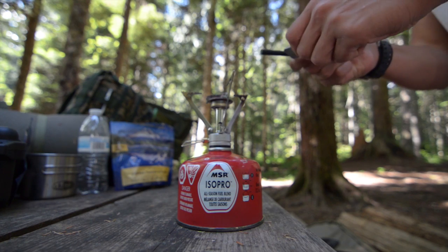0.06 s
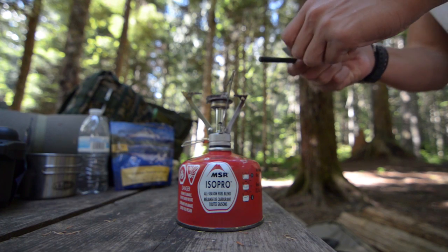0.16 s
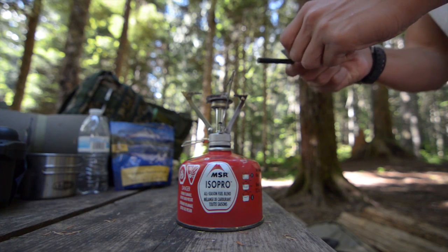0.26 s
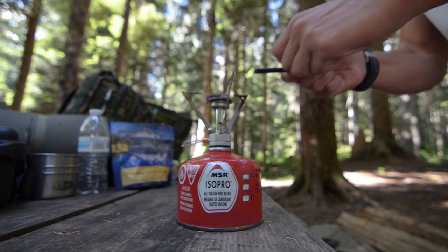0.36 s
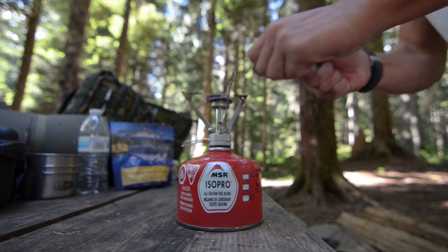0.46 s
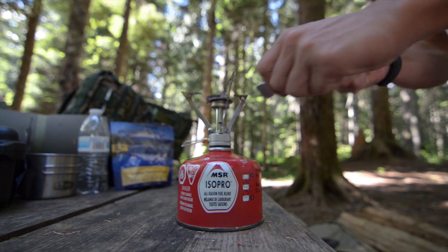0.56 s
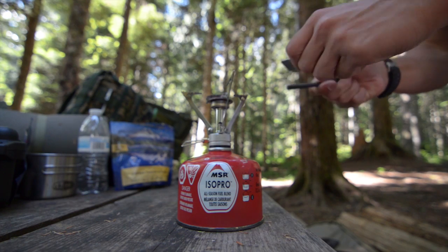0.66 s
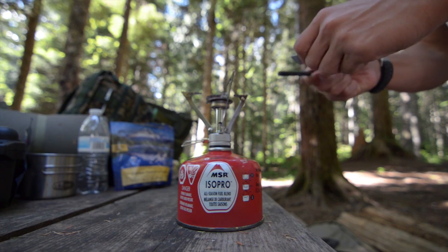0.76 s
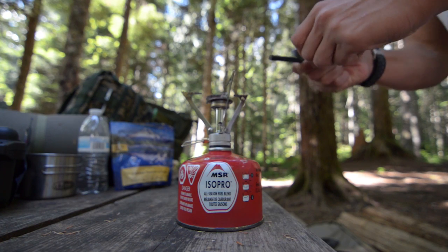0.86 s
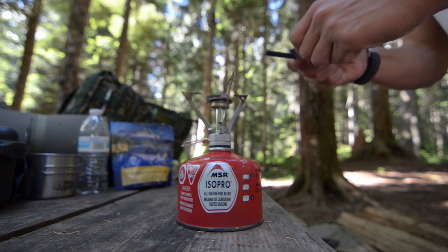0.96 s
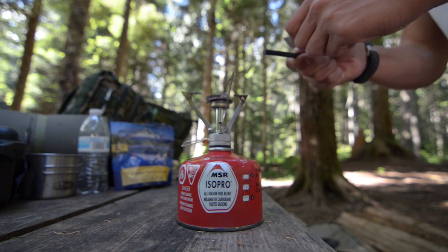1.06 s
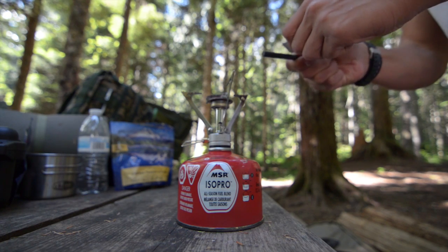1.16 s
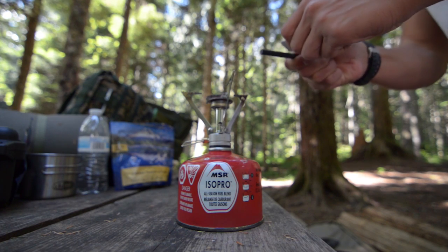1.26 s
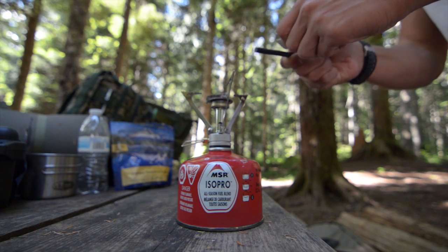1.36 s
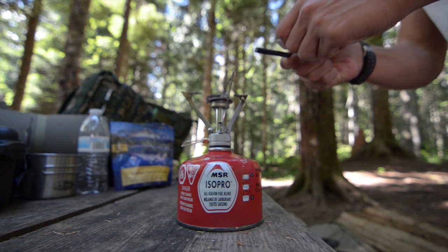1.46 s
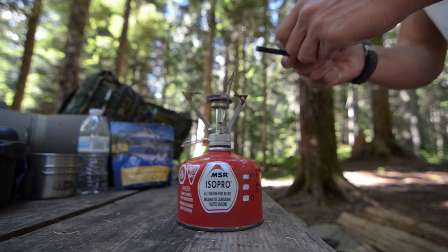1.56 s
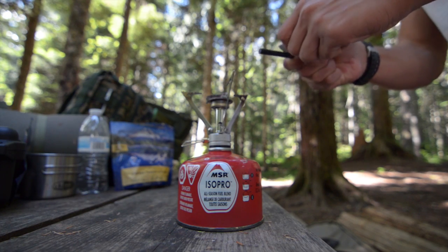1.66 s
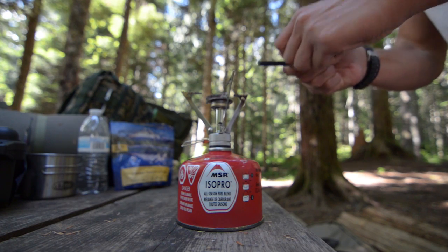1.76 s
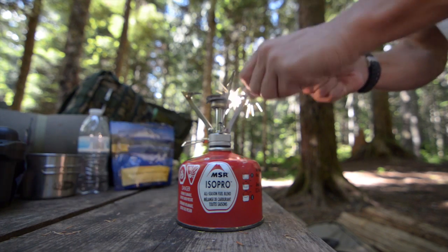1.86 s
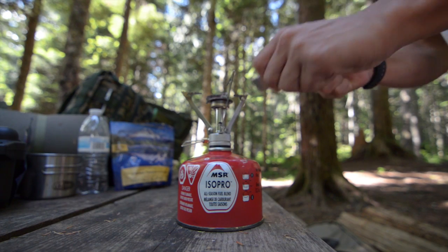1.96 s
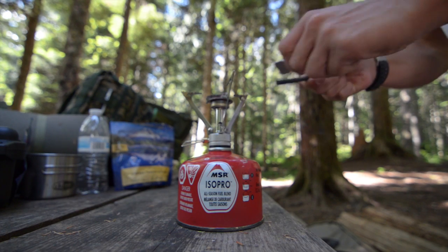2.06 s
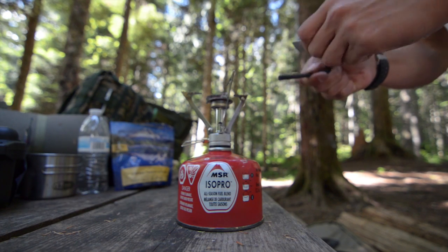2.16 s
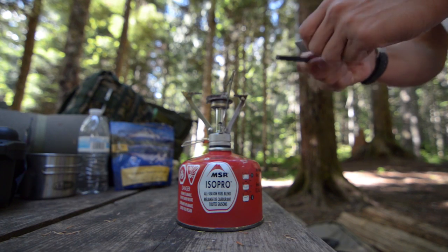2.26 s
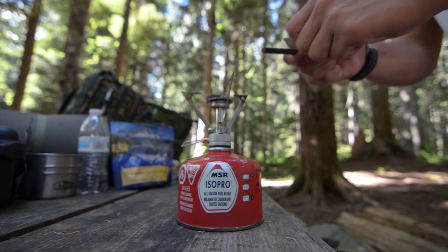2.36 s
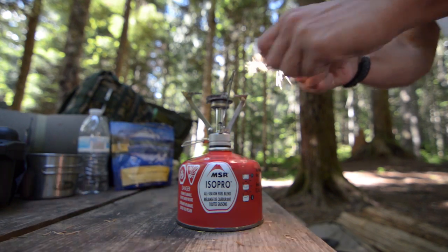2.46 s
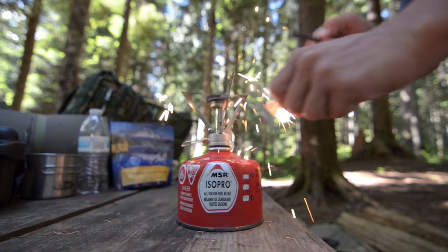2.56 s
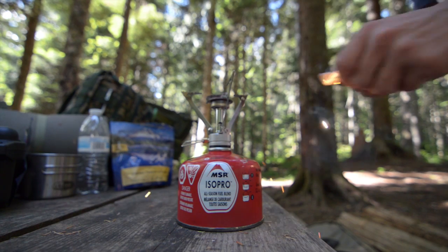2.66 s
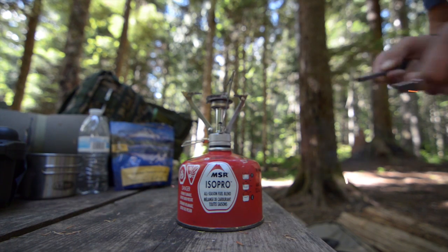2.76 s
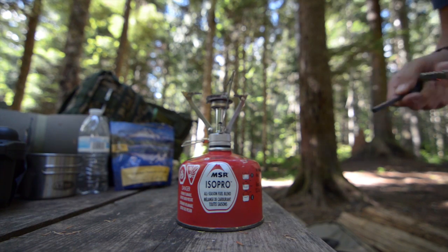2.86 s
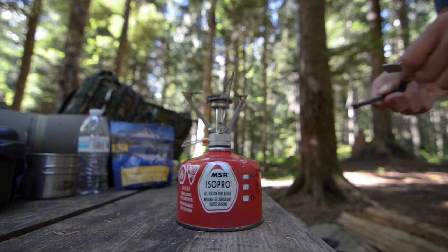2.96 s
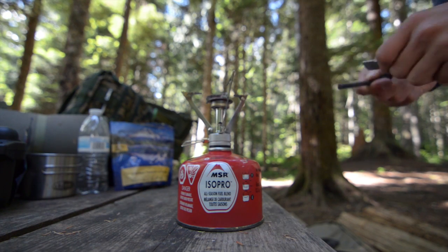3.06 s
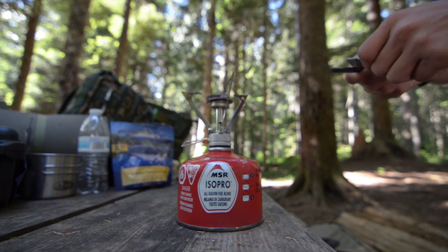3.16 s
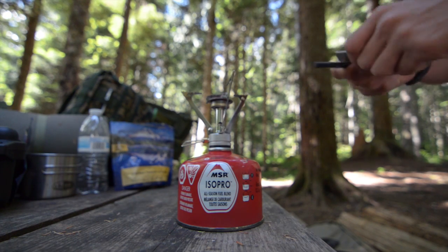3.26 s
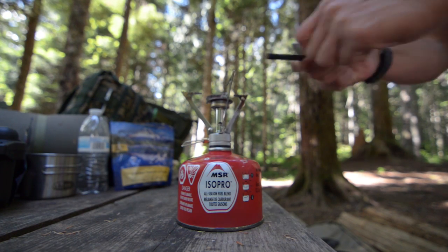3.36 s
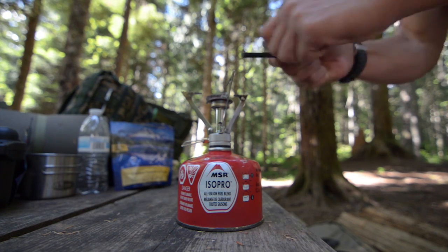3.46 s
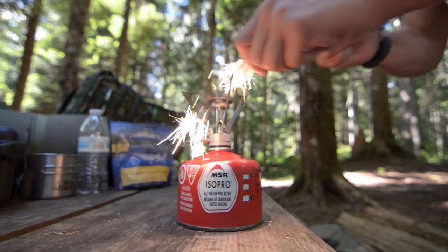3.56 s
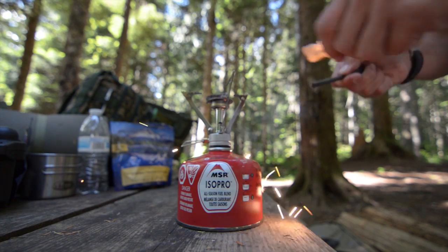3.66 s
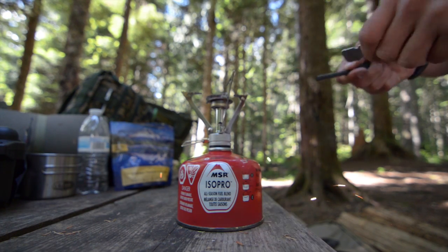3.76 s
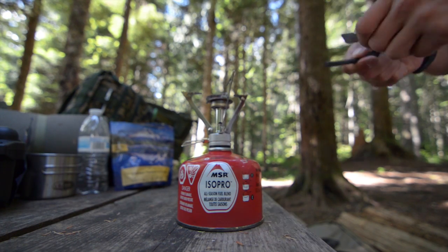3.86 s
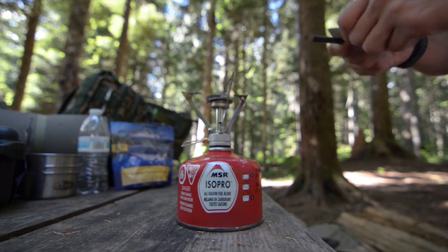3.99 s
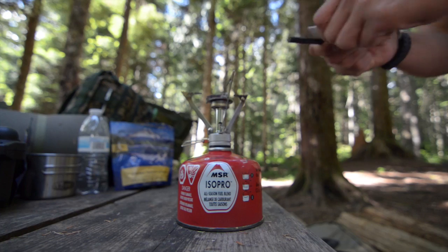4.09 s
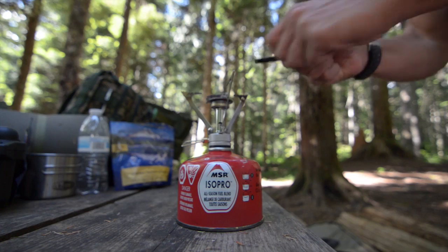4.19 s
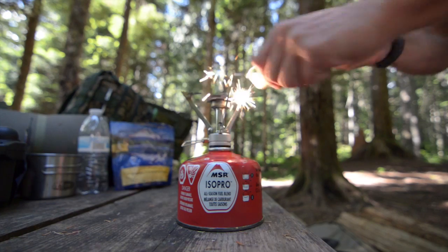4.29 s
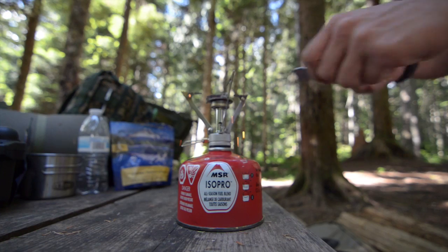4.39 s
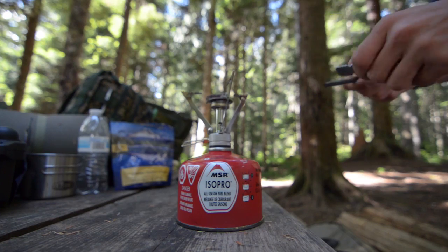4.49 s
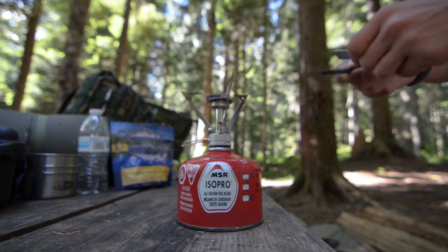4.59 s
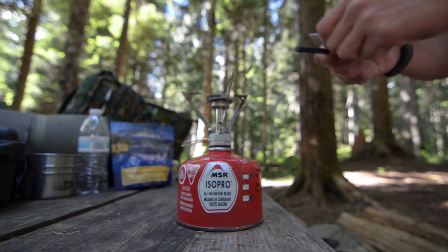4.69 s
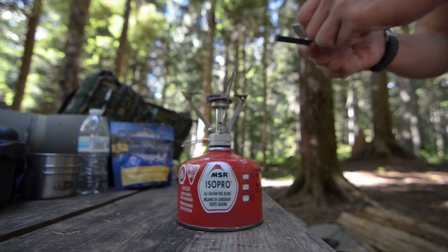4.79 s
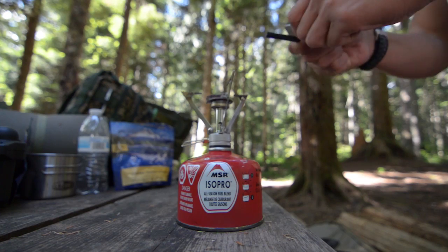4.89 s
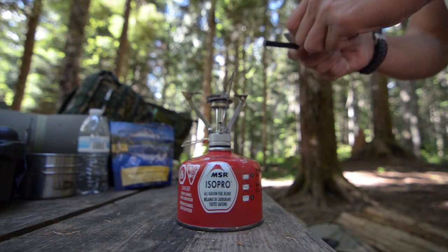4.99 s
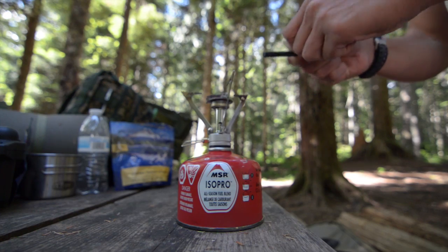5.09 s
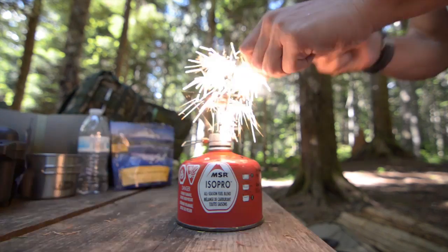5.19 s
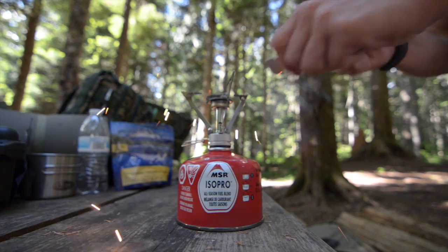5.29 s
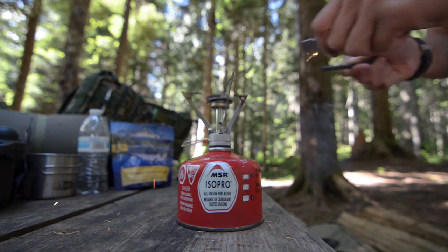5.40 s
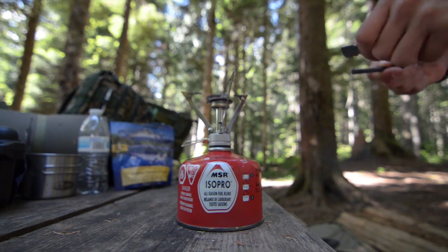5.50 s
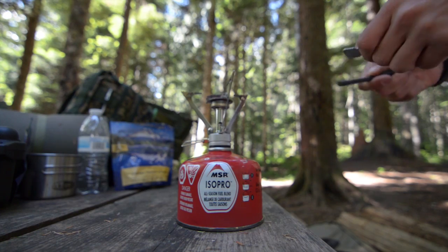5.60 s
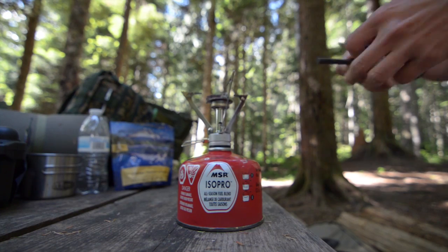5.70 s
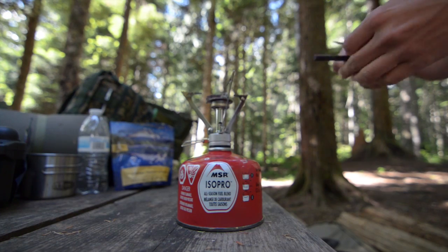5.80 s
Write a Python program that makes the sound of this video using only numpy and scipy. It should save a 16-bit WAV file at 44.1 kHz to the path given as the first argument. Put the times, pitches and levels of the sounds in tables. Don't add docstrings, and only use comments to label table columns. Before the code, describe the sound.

A close outdoor recording with a faint steady gas hiss from a stove burner and low, lumpy wind buffeting a small microphone. Soft scuffs and light steel taps open it. At 0.5 s a quick scrape ends in a hard, bright metallic snap without sparks. Small ticks follow, then a longer, duller scrape at 1.9 s with a softer snap and brief weak fizz. A clear tap at 2.3 s precedes a raspy stroke at 2.5 s: the loudest snap, then a short flame-like puff, fizz and crackling pops until about 2.75 s. Strokes at 3.55 and 4.3 s snap sharply with bursts of spitting sparks, the latter shorter. Wind weakens around 3.6 s, then swells with deep thumps near 5 s. The last loud, raspy strike at 5.2 s bursts into bright fizz and pops, with tiny ticking embers fading by 5.45 s, leaving hiss and easing wind.

```python
import sys
import numpy as np
from scipy import signal
from scipy.fft import rfft, irfft, next_fast_len
from scipy.io import wavfile
from scipy.ndimage import uniform_filter1d, map_coordinates

SR = 44100
rng = np.random.default_rng(int(sys.argv[2]) if len(sys.argv) > 2 else 0)


def wrap_up_sound(samples):
    columns = np.atleast_2d(samples).T
    tamed = np.clip(columns, -1, 1)
    steps = np.round(tamed * 32767).astype(np.int16)
    wavfile.write(sys.argv[1], SR, steps)


def natural_amplitude(level_db):
    exponent = np.asarray(level_db, float) / 20
    return 10 ** exponent


N = 257544


def unit(x):
    return x / np.sqrt(np.mean(x ** 2) + 1e-20)


def curve(rows, column, outside=None):
    rows = np.asarray(rows)
    return np.interp(np.arange(N) / SR, rows[:, 0], rows[:, column], outside, outside)


BURST_HOLD_S = 0.006


def effort(bursts, lead=0):
    held = []
    for rows in bursts:
        before = (rows[0][0] - lead, *rows[0][1:])
        after = (rows[-1][0] + BURST_HOLD_S, *rows[-1][1:])
        held.append([before, *rows, after])
    main = [curve(rows, 1, -150) for rows in held]
    relative = [[0] + [curve(rows, k) for k in range(2, len(rows[0]))] for rows in held]
    gains = []
    for k in range(len(relative[0])):
        loudest_db = np.max([a + b[k] for a, b in zip(main, relative)], axis=0)
        gains.append(uniform_filter1d(natural_amplitude(loudest_db), size=60))
    return gains


def wobble(rate):
    knots = rng.standard_normal(int(N * rate / SR) + 4)
    return map_coordinates(knots, [np.arange(N) * rate / SR])


def filtered(x, response):
    m = next_fast_len(len(x) + 8192)
    return irfft(rfft(x, m) * response(np.fft.rfftfreq(m, 1 / SR)), m)[:len(x)]


def colour(points):
    f, db = np.transpose(points)
    return lambda hz: natural_amplitude(np.interp(np.log(hz + 1), np.log(f + 1), db))


def resonance(f, centre, width):
    return 1j * f * width / (centre * centre - f * f + 1j * f * width)


def modes(rows):
    return lambda f: sum((-1) ** k * natural_amplitude(db) * resonance(f, c, w) for k, (c, w, db) in enumerate(rows))


def grit(rate, spread_db):
    luck, size, sign = rng.random(N), rng.exponential(size=N), rng.standard_normal(N)
    return (luck < rate / SR) * sign * natural_amplitude(spread_db * np.minimum(size, 4.5))


def struck(blow, *resonances):
    blow = filtered(blow, lambda f: 1 / (1 + 1j * f / 11000) ** 3)
    for rows in resonances:
        blow = filtered(blow, modes(rows))
    return blow / np.max(abs(blow))


# frequency in Hz, level in dB per Hz.
GAS = [(120, -13), (200, -12.5), (236, -11), (458, -9), (662, -8), (922, -8.5), (1130, -10), (2680, -15),
       (2890, -15.5), (4170, -10), (5600, -22), (6140, -15.5), (9040, -24), (14900, -46.5), (16300, -52)]
# peak in seconds, rise and fall in seconds, level in dB.
MURMURS = [
    (.745, 0.09, -48.5),
    (3.006, .045, -47),
]


def gas():
    flutter = [(640, 510, 0)]
    murmur = filtered(filtered(rng.standard_normal(N), modes(flutter)), modes(flutter))
    ends_db = -10
    swell, = effort([[(s - d, db + ends_db), (s, db), (s + d, db + ends_db)] for s, d, db in MURMURS])
    hiss = filtered(rng.standard_normal(N), colour(GAS))
    sway_db = 0.3 * (wobble(28) + wobble(1.28))
    return natural_amplitude(-49 + sway_db) * unit(hiss) + swell * unit(murmur)


# frequency in Hz, level in dB per Hz.
BUFFET = [(12, -47), (20, -3), (59, 3.5), (75, 2), (215, -10), (316, -14), (433, -21), (600, -72),
          (780, -59), (1320, -120)]
# time in seconds, buffeting level in dB.
WIND = [(0.0, -58.5), (0.34, -53), (0.71, -56), (1.71, -53.5), (1.97, -55), (2.26, -60.5), (2.62, -53),
        (2.7, -53), (2.83, -58), (3.61, -64), (4.26, -61.5), (4.9, -49), (5.09, -45.5), (5.38, -45),
        (5.56, -54), (5.84, -62.5)]
# time in seconds, peak in dB, pitch in Hz.
THUMPS = [(.461, -30.5, 185), (.521, -35, 85), (.824, -34.5, 76), (1.117, -37, 114), (1.271, -30, 97),
          (1.539, -29.5, 94.5), (1.653, -32.5, 99), (1.793, -31, 100), (2.515, -33, 220), (2.543, -27, 179),
          (2.58, -29, 197), (2.626, -30.5, 98), (3.142, -33, 85.5), (3.619, -44, 200), (4.042, -35, 110),
          (4.51, -38, 80.6), (2.831, -36, 75.5), (4.332, -39, 197), (4.835, -32.5, 129), (4.92, -30.5, 103),
          (4.949, -28, 116), (5.002, -28, 75.4), (5.046, -26.5, 107), (5.152, -28, 106),
          (5.191, -22.5, 157), (5.227, -38, 113), (5.35, -29, 111), (5.4, -30.5, 102), (5.478, -30.5, 91),
          (5.519, -32, 119)]
# time in seconds, peak in dB, pitch in Hz.
FLICKS = [
    (.466, -35, 300),
    (4.988, -31, 420),
    (5.025, -33, 450),
    (5.352, -32, 400),
    (4.93, -38, 330),
]


def wind():
    lumps = natural_amplitude(3.5 * wobble(16))
    half = SR // 16
    out, t = np.zeros(N + SR), np.arange(-half, half) / SR
    when, luck = rng.uniform(1 / 16, N / SR, size=30), rng.standard_normal(size=(30, 2))
    stray_db = np.interp(when, *np.transpose(WIND)) + 11 + 2.8 * luck[:, 0]
    stray_hz = 102 * np.exp(0.31 * luck[:, 1])
    for s, db, hz in [*THUMPS, *FLICKS, *zip(when, stray_db, stray_hz)]:
        push = np.exp(-(2.46 * t * hz) ** 2) * np.cos(2 * np.pi * (hz * t + rng.random()))
        out[int(s * SR + 1) - half:][:len(t)] += natural_amplitude(db + 1.0) * push
    buffeting = unit(lumps * filtered(rng.standard_normal(N), colour(BUFFET)))
    return out[:N] + natural_amplitude(curve(WIND, 1) + 4.0) * buffeting


def scuff(s, length, db, *mix):
    rise, ends_db = 0.66, -8.5
    start, end = s - rise * length, s + (1 - rise) * length
    return [(start, db + ends_db, *mix), (s, db, *mix), (end, db + ends_db, *mix)]


def stroke(start, end, bite_db, tip_db, rub_db):
    bite, glide = 0.16, 0.62
    u = np.array([0, bite, glide, 1])
    chatter = bite_db + (tip_db - bite_db) * (u - bite) / (1 - bite) - 7.5 * (u == 0)
    bend = np.interp(u, [0, glide], [-9.5, -13])
    rub = np.interp(u, [0, glide, 1], [-9.5, -21, rub_db])
    return np.transpose([start + u * (end - start), chatter, bend, rub])


def squeal():
    times = np.ravel([row[:2] for row in STROKES])
    hz = np.interp(np.arange(N) / SR, times, [8150, 7700] * len(STROKES))
    waver = lambda f: 1 / (1 + (f / 190) ** 2)
    a, b = (filtered(rng.standard_normal(N), waver) for _ in "ab")
    turn = 2 * np.pi * np.cumsum(hz) / SR
    return unit(a * np.cos(turn) + b * np.sin(turn))


# peak in seconds, length in seconds, chatter in dB,
# rod bending in dB re chatter, rub in dB re chatter.
SCUFFS = [(0.007, 0.061, -35.5, -27, -9), (0.062, 0.028, -42, -24, 0.5), (0.443, .022, -57, 11.5, -1),
          (0.509, 0.017, -25.5, -22, -6), (0.642, 0.1, -56, 1, 2.5), (0.909, .035, -53, 4, 7),
          (0.967, 0.023, -46.5, 4, 8.5), (1.034, 0.012, -44.5, 6, 9), (1.658, 0.032, -56.5, 3, 3),
          (1.857, 0.017, -48, 13.5, 2), (3.503, 0.01, -45, 10, 3), (4.248, 0.016, -52, 17.5, 0),
          (5.056, 0.01, -42.5, -3, -0.5), (5.204, 0.041, -51, 17, 0)]
# start in seconds, end in seconds, chatter after the bite in dB,
# chatter at the tip in dB, rub at the tip in dB re chatter.
STROKES = [
    (.461, 0.492, -30, -22, -8.5),
    (1.865, 1.915, -24, -29, -18),
    (2.482, 2.531, -30, -20.5, 0),
    (3.515, 3.5564, -24, -24, -9),
    (4.253, 4.297, -26, -23, -8),
    (5.203, 5.242, -26.5, -18.5, 1),
]
# frequency in Hz, width in Hz, level in dB.
EDGE = [(4110, 180, -7), (4950, 510, -7), (6480, 560, 3), (7440, 880, 7.5), (8260, 1700, 4), (9930, 610, 1),
        (11100, 670, -11.5), (12600, 1500, -12)]
# frequency in Hz, width in Hz, level in dB.
BENDING = [(1710, 430, -3.5), (900, 220, -7.5)]
# frequency in Hz, level in dB per Hz.
RUB = [(150, -3.5), (400, -1), (1000, -9.5), (2300, -6.5), (4000, 3.5), (6500, -10), (11000, -17),
       (16000, -30)]


def strokes():
    bursts = [stroke(*row) for row in STROKES] + [scuff(*row) for row in SCUFFS]
    chatter, bend, rub = effort(bursts, lead=BURST_HOLD_S / 2)
    bite = natural_amplitude(1.5 * wobble(260))
    ringing = lambda f: modes(EDGE)(f) / (1 + (f / 13000) ** 4)
    edge = unit(filtered(bite * grit(16000, spread_db=1.2), ringing))
    rod = unit(filtered(filtered(grit(3000, spread_db=-0.5), modes(BENDING)), modes(BENDING)))
    rasp = unit(filtered(bite * grit(9000, spread_db=3.0), colour(RUB)))
    steel = edge + natural_amplitude(-7) * squeal()
    return natural_amplitude(-0.36) * chatter * steel + natural_amplitude(-1.5) * bend * rod + natural_amplitude(-0.5) * rub * rasp


# time in seconds, peak in dB, bending in Hz,
# bending in dB re peak, lower blade in dB re peak.
TAPS = [(.1521, -23, 2300, -21, -2.5), (0.2952, -25.5, 1660, -14.5, -2.5), (0.4575, -23, 1760, -8.5, -0.5),
        (0.5196, -14, 1680, -1.2, -6), (0.857, -22.5, 1770, -6, 0.8), (1.5966, -30, 1695, -8, 1),
        (1.8539, -34, 1650, -6, -17), (1.875, -30, 1730, -8, -23), (2.0667, -50, 2280, 6, 10),
        (2.3273, -9.5, 1800, -12, -7), (2.3364, -43, 1630, -17, -13), (3.1996, -35, 1540, -4.5, 1),
        (4.0266, -28.5, 1580, 1, -3), (4.2347, -27, 1690, -14, -9.5), (4.9092, -41, 1730, -3.5, -9)]
# time in seconds, peak in dB, bending in Hz, blade ring in Hz,
# lower blade in dB re peak.
SNAPS = [
    (0.4959, -4.5, 1970, 7540, -1.5),
    (1.9217, -10.5, 1640, 7540, -6),
    (2.5324, 0.1, 1720, 8170, -8.5),
    (3.5639, -2.5, 1620, 7350, -9.5),
    (4.3023, -2.2, 1600, 6890, -6.5),
    (5.2479, -1.3, 1670, 8150, -8),
]
# frequency in Hz, width in Hz, level in dB.
STEEL = [(6300, 240, 0), (7800, 360, -1), (9490, 590, -3), (10660, 200, -4.5), (12500, 3400, -16)]
# frequency in Hz, width in Hz, level in dB.
GRIP = [(3100, 590, -8), (3720, 350, 0), (4970, 640, -2.5)]


def taps():
    out, t = np.zeros(N + SR), np.arange(SR // 20) / SR
    snaps = [(s, db, hz, -12, ring, grip) for s, db, hz, ring, grip in SNAPS]
    light = [(s, db, hz, bend, 7350, grip) for s, db, hz, bend, grip in TAPS]
    fall = (1 - np.exp(-t / 0.0001)) * (natural_amplitude(-60 * t / 0.008) + 0.1 * natural_amplitude(-60 * t / 0.03))
    first_blow = 3.5 * (np.arange(len(t)) == 4)
    for s, db, bend_hz, bend_db, ring_hz, grip_db in snaps + light:
        rattle = fall * rng.standard_normal((3, len(t))) + first_blow
        blade = struck(rattle[0], STEEL + [(ring_hz, 320, 4)])
        lower = struck(rattle[1], GRIP)
        slow_start = t / (t + 0.00025)
        rod = struck(slow_start * rattle[2], [(bend_hz, 1500, 0)], [(bend_hz, 300, 0), (950, 500, -13)])
        hit = blade + natural_amplitude(grip_db + 2.5) * lower + natural_amplitude(bend_db + 4) * rod
        out[round((s + 0.0007) * SR):][:len(t)] += natural_amplitude(db + 1.5) * hit

    def table(f):
        delay = np.exp(-2j * np.pi * f * 0.0029)
        return natural_amplitude(-22.5) * delay * (1 / (1 + 1j * f / 4000) + modes([(1950, 200, 6)])(f))

    return out[:N] + filtered(out[:N], table)


def flare(start, end, first_db, last_db, fizz_db):
    fade_db = 4.5
    low = fizz_db - fade_db / 2
    return [(start, first_db, low + fade_db), (end, last_db, low), (end + 0.009, last_db - 14, low)]


# start in seconds, end in seconds, roar at the start in dB,
# roar at the end in dB, fizz in dB re roar.
SHOWERS = [(1.89, 1.926, -55, -38, 10), (1.928, 1.951, -31.5, -39, 6), (2.51, 2.527, -32.5, -31, 1),
           (2.543, 2.591, -22.5, -27.5, 6), (2.608, 2.683, -35.5, -36, 5), (3.572, 3.6, -29, -25, 7.5),
           (3.604, 3.648, -27, -31, 5.5), (3.653, 3.727, -42, -57, 0.5), (4.309, 4.356, -30, -28, 6.5),
           (5.229, 5.249, -30, -20, 2), (5.255, 5.305, -21.5, -35.5, 6)]
# frequency in Hz, level in dB per Hz.
ROAR = [(82, -44), (140, -10), (545, -5), (817, 0.5), (1850, -4.5), (2010, -36), (2200, -15.5),
        (2860, -25.5), (4840, -120)]
# frequency in Hz, level in dB per Hz.
FIZZ = [(760, -16), (1300, -24.5), (1840, -35), (2010, -5), (2330, -1), (3990, -0.5), (5030, 1), (5660, 1),
        (6220, 0), (7530, -1), (10900, -8), (14300, -26), (16300, -40)]


def showers():
    roar, fizz = effort([flare(*row) for row in SHOWERS], lead=BURST_HOLD_S)
    clumps = wobble(200)
    low = unit(natural_amplitude(1.5 * clumps) * filtered(grit(6000, spread_db=1.5), colour(ROAR)))
    high = unit(natural_amplitude(1.8 * clumps) * filtered(grit(14000, spread_db=2.2), colour(FIZZ)))
    return natural_amplitude(1.0) * roar * low + natural_amplitude(-1.0) * fizz * high


# time in seconds, spit peak in dB, fullness
# in dB re spit.
POPS = [(1.9335, -30, -15), (2.5768, -5, -14), (2.5904, -7, -21), (2.625, -16, -12), (2.6328, -10.5, -24),
        (2.658, -28, -19), (2.6879, -18.5, -7), (2.703, -35, 2), (2.7471, -25, -19), (3.5864, -2, -12),
        (3.647, -31, -9), (3.6537, -10, -11.5), (3.6713, -14.5, -8), (3.688, -24, -15), (3.7023, -30, 0),
        (3.716, -29, -1), (3.7285, -31.5, 4.2), (3.7702, -40.5, 7.5), (4.244, -32, -15), (4.311, -20, -6),
        (4.3312, -15.5, 0.5), (4.359, -11, -21), (5.227, -17, -12), (5.2585, -2, -10), (5.3351, -27.5, 3),
        (5.3364, -23.5, 0.5), (5.387, -25, -9), (5.3921, -21, -13), (5.401, -21.5, -15), (5.444, -32, -13),
        (1.965, -39, 0),
    (1.981, -37, -6),
    (3.68, -34, -14),
    (3.724, -37, -4),
    (3.782, -41, 1),
    (5.3828, -31, -4),
    (5.4355, -34, -17),
    (5.451, -36, -15),
]


def pops():
    out, t = np.zeros(N + SR), np.arange(SR // 50) / SR
    fall = (1 - np.exp(-t / 0.0003)) * natural_amplitude(-60 * t / 0.007) + 0.077 * natural_amplitude(-60 * t / 0.065)
    for s, db, full_db in POPS:
        puff = fall * rng.standard_normal((3, len(t)))
        spit = struck(puff[0], [(7840, 1900, 0)], [(9000, 8800, 0)])
        crack = struck(puff[1], [(3900, 3600, 0)], [(4000, 3800, 0)])
        thump = struck(puff[2], [(1190, 1400, 0)], [(1270, 2000, 0)])
        burst = spit + natural_amplitude(full_db + 5) * crack + natural_amplitude(full_db + 3.0) * thump
        out[round((s + 0.0005) * SR):][:len(t)] += natural_amplitude(db - 5.5) * burst
    return out[:N]


def scene():
    return (strokes() + showers() + taps() + pops() + gas() + wind())[None]


# frequency in Hz, width in Hz, depth from 0 to 1.
HOUSING = [(5715, 370, 0.7), (6890, 190, 0.6), (3440, 61, 0.6), (3625, 145, 0.6), (4160, 130, 0.5),
           (6440, 86, 0.9), (9600, 240, 0.21), (11200, 620, 0.08)]


def housing(x):
    dips = lambda f: np.prod([1 - min(d, 0.99) * resonance(f, c, w) for c, w, d in HOUSING], axis=0)
    return filtered(x, dips)


def top_cut(x):
    return signal.sosfilt(signal.butter(12, 16440, fs=SR, output="sos"), x)


def record(dry):
    clipped = np.clip(housing(dry[0]), -0.93, 0.93)
    mix = filtered(clipped, lambda f: np.where(f < 15760, 1, natural_amplitude(-28)))
    return top_cut(mix[None])


dry = scene()
out = record(dry)
wrap_up_sound(out)
```